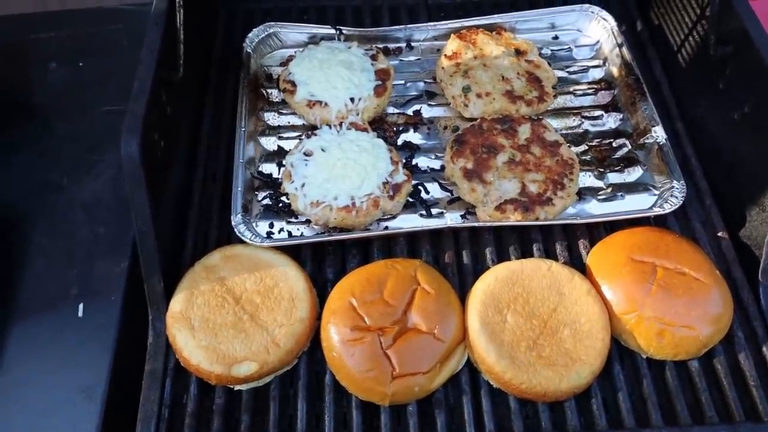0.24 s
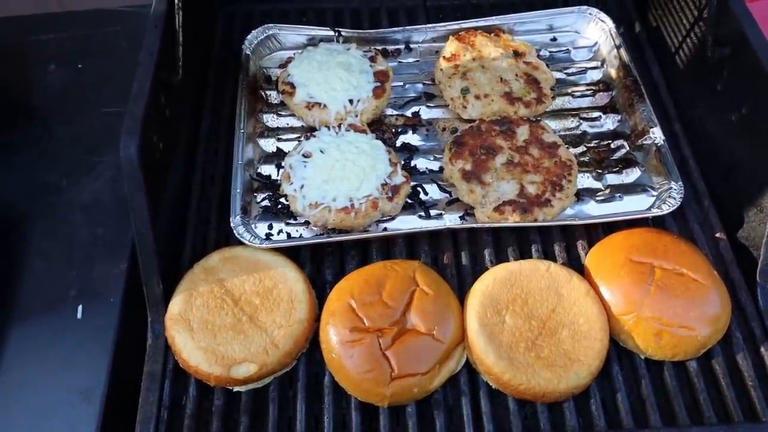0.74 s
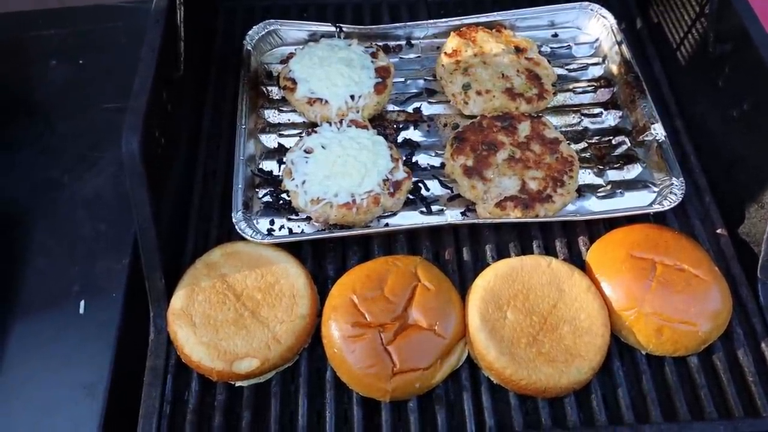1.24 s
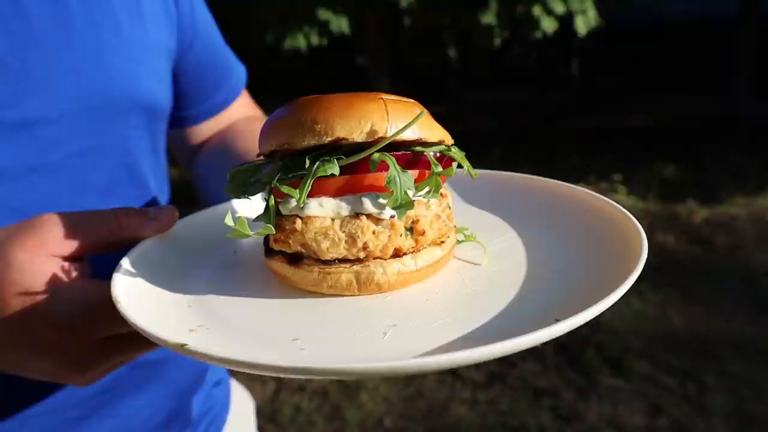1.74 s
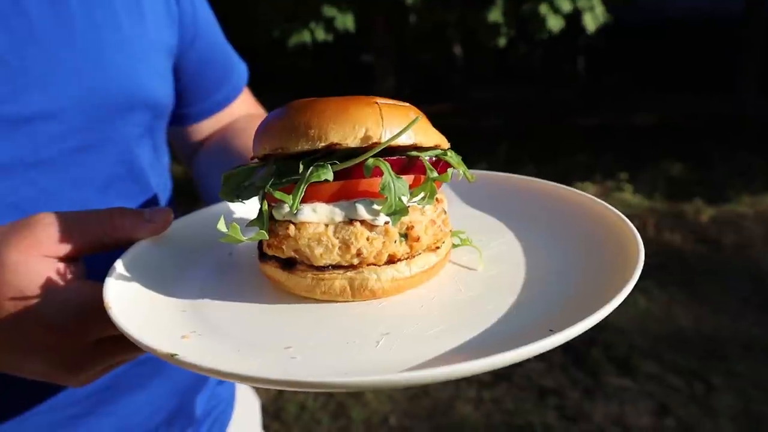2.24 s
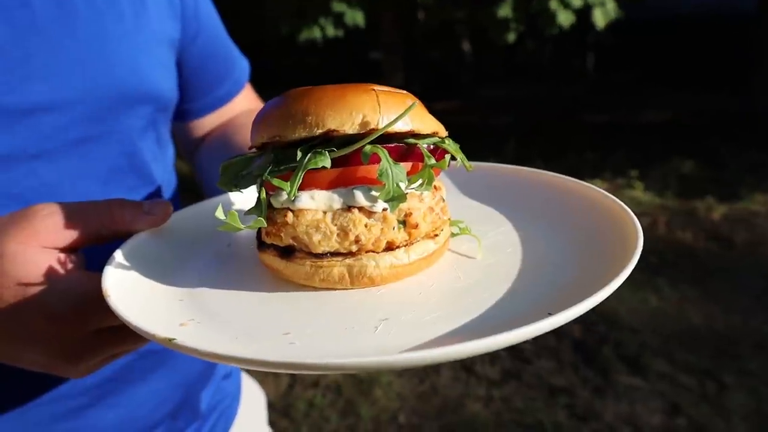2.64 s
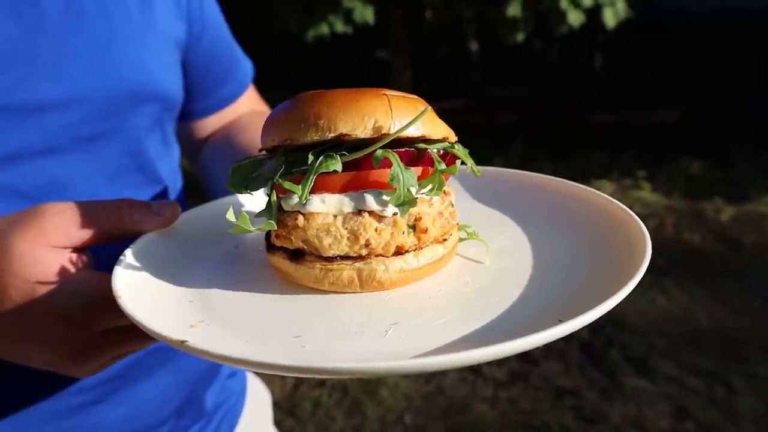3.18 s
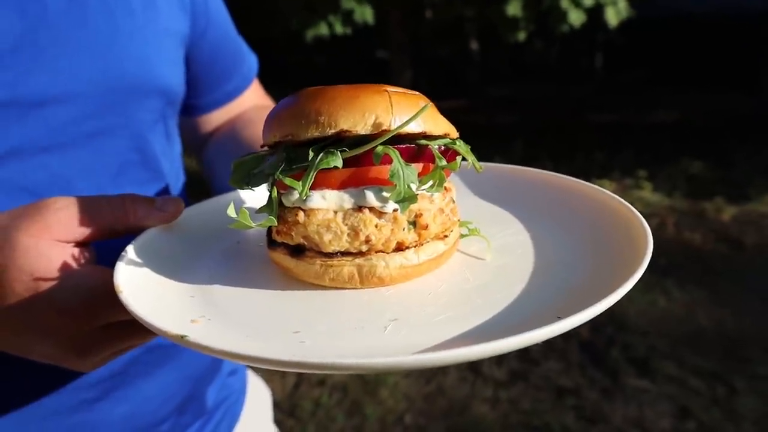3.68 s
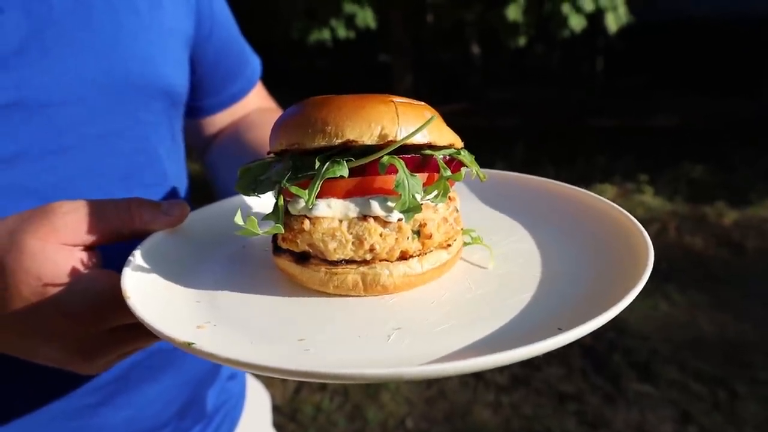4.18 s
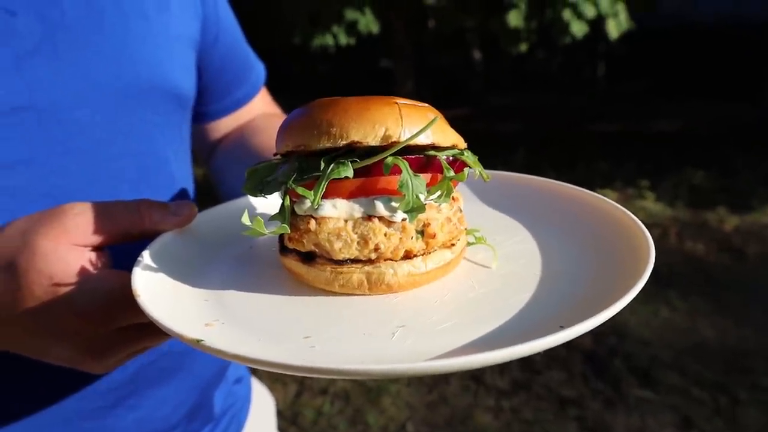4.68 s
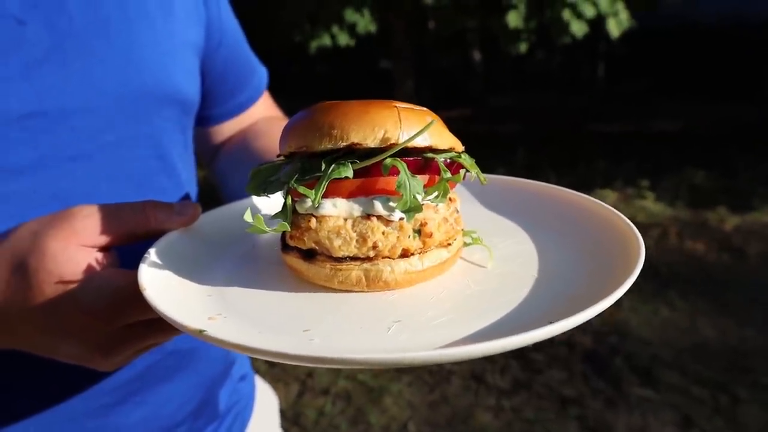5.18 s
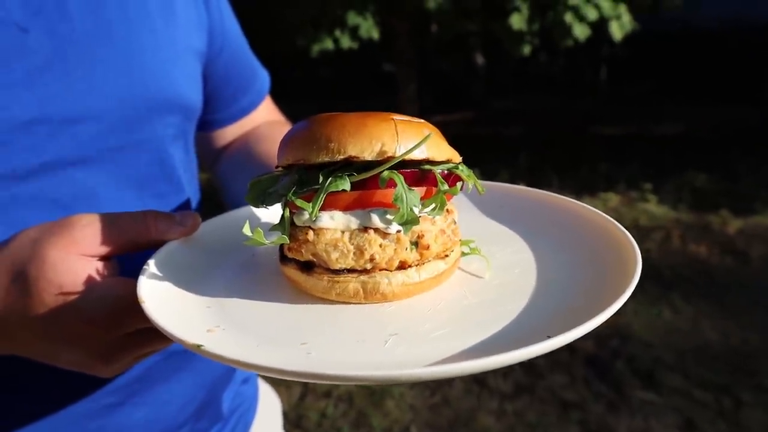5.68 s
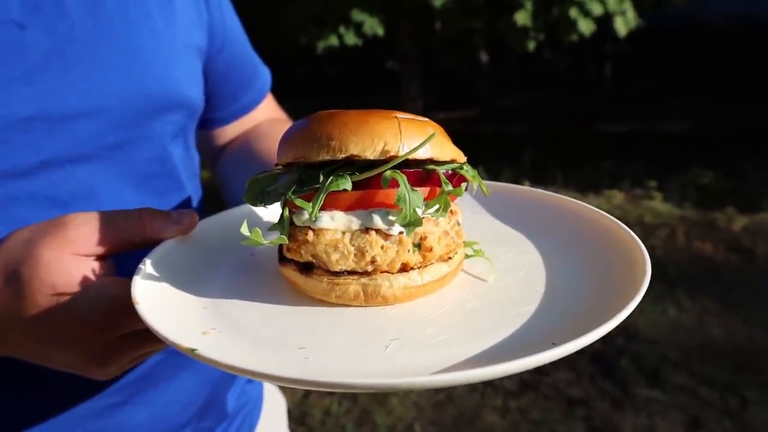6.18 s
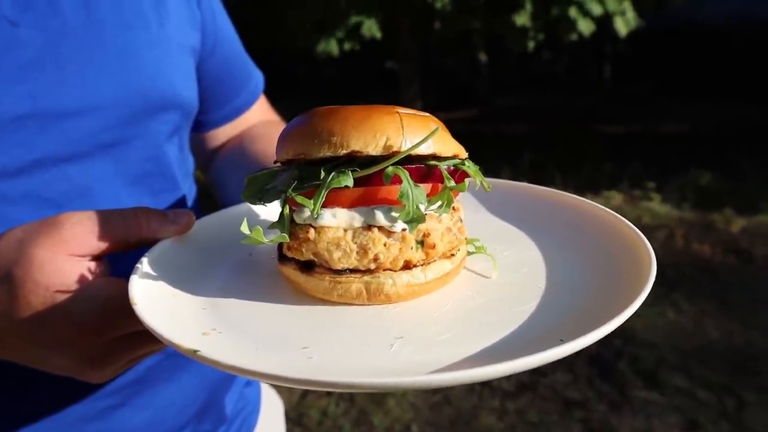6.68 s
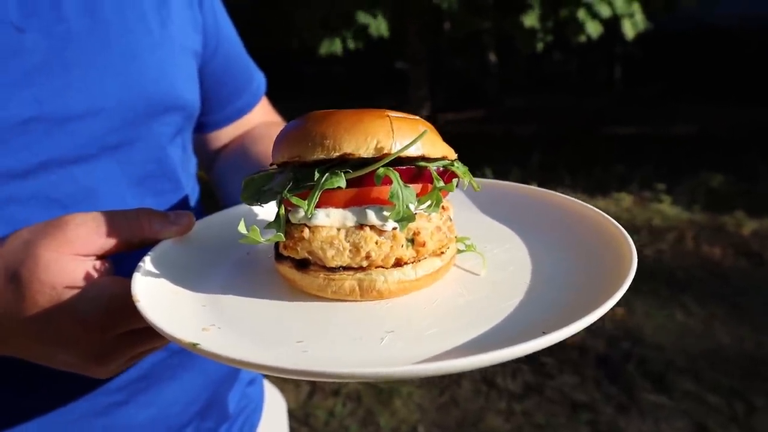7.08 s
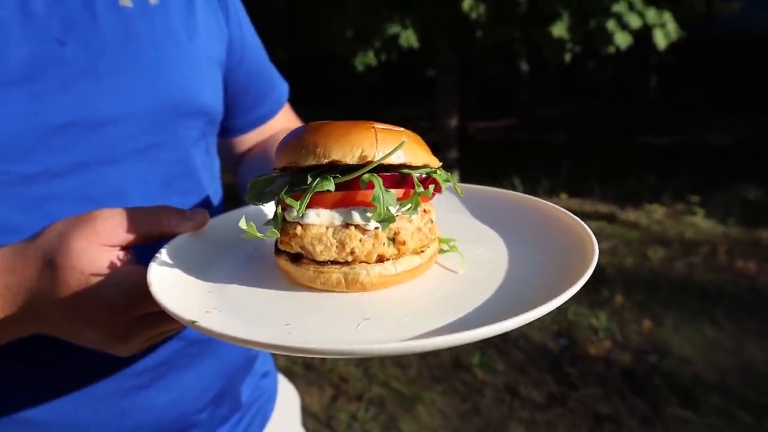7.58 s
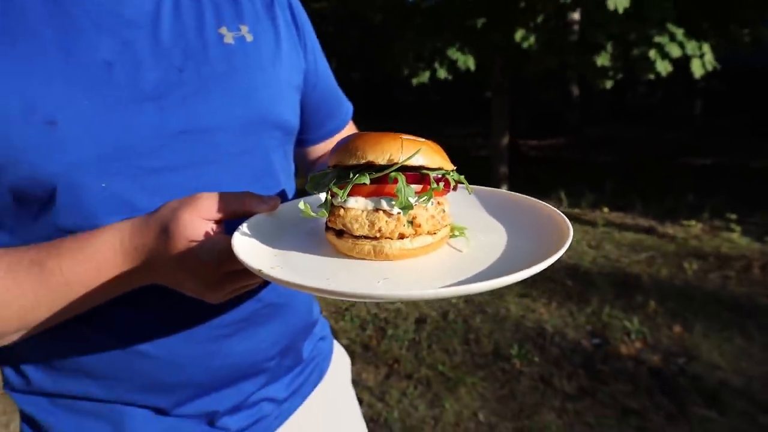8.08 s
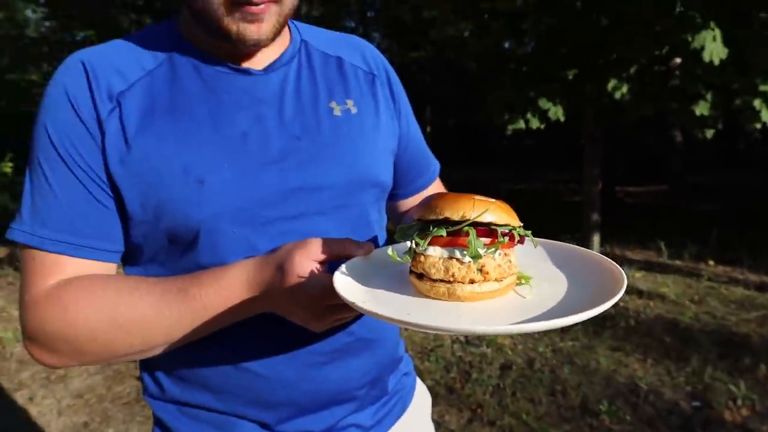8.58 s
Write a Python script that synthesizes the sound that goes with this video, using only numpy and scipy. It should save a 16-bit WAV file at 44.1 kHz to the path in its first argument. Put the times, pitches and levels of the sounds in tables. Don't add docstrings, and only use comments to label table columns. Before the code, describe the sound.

Fat sizzles and spits loudly over a roaring gas grill with crickets chirping, then a sudden cut to a quieter yard with a vehicle droning away.

```python
import sys
import numpy as np
from scipy import signal
from scipy.io import wavfile
from scipy.ndimage import uniform_filter1d

SR = 44100
rng = np.random.default_rng(int(sys.argv[2]) if len(sys.argv) > 2 else 0)


def waveform_to_disk(signal):
    frames = np.transpose(np.atleast_2d(signal))
    scaled = np.clip(frames, -1, 1) * 32767
    samples = np.round(scaled).astype(np.int16)
    wavfile.write(sys.argv[1], SR, samples)


def volts_from_decibels(level):
    exponent = np.asarray(level, float) / 20
    return 10 ** exponent


N = 389395

GRILL_END_S, YARD_START_S = 1.8008, 1.8118
# f/Hz, density/dB
AIR_COLOR = [(120, -34), (200, -1), (456, -5.5), (763, -3), (1320, -7.5), (3130, -22), (3760, -21.5),
             (4600, -17), (5630, -25.5), (14600, -35.5), (16000, -35.5)]
# f/Hz, density/dB
ROAD_COLOR = [(59, -39), (100, -8.5), (124, -6), (147, -30.5), (207, -26), (249, -29), (498, -23.5),
              (1280, -20), (1660, -23.5), (2680, -37), (4000, -43), (5200, -81.5), (8800, -120)]
# t/s, level/dB
ROAD_LEVEL = [
    (1.82, -42),
    (2.89, -42.5),
    (6.12, -52),
    (6.25, -55),
    (7.54, -51.5),
    (8.79, -63),
    (8.83, -56),
]
# f/Hz, density/dB
WIND_COLOR = [(15, -3.5), (30, 2.5), (50, 2), (100, -6), (160, -20), (300, -30.5), (600, -55)]
# peak t/s, peak level/dB, time to fall by PUFF_FALL_DB/s
GUSTS = [(1.82, -51, .2), (3.5, -50.5, 0.04), (3.82, -38.5, 0.1546), (3.98, -36.5, 0.15),
         (4.12, -42.5, 0.15), (4.36, -45.5, 0.12), (4.62, -33.5, 0.1554), (4.775, -31.5, 0.06),
         (5.03, -39, 0.1332), (5.13, -43.5, .2), (5.3, -42.5, 0.17), (5.51, -46.5, 0.25),
         (5.64, -48.5, 0.3), (6.45, -51, 0.7), (7.21, -45, .2), (7.38, -48.5, 0.63), (7.62, -49, 0.5),
         (7.83, -43.5, 0.1), (7.96, -42.5, 0.14), (8.14, -36, .25), (8.32, -38.5, 0.22),
         (8.57, -40.5, 0.21), (8.71, -40, 0.22)]
PUFF_FALL_DB, CALM_DB = 19.5, -59
# middle t/s, length/s, low singers' drop/dB, middle singers' drop/dB
LULLS = [(2.27, .3, 5, 18), (2.72, 0.19, 11.5, 14.5), (2.97, .22, 10.5, 16.5), (3.38, 0.35, 0, 16),
         (4.9, 0.4995, 26, 11.5), (5.4, 0.3584, 22, 22), (5.7, 0.293, 14, 1), (6.15, 0.415, 23, 5),
         (6.58, .3, 20.5, 25), (6.93, .18, 20, 14.5), (7.25, .2, 5, 14), (8.15, 0.2016, 12.5, 20),
         (8.39, .16, 20.5, 5.5), (8.799, 0.295, 10, 2.5)]
# t/s, peak level/dB, f/Hz of the loud first half
YARD_STROKES = [(1.935, -52, 4620), (1.998, -52, 4590), (2.105, -54, 4680), (2.349, -48, 4590),
                (2.397, -48, 4610), (2.484, -45, 4680), (2.527, -46, 4690), (2.576, -45, 4650),
                (2.602, -49, 4740), (2.644, -55, 4730), (2.770, -49, 4600), (2.814, -49, 4620),
                (3.072, -45, 4690), (3.108, -45, 4680), (3.148, -46, 4660), (3.189, -48, 4680),
                (3.552, -52, 4610), (3.675, -46, 4670), (3.719, -45, 4680), (3.769, -46, 4670),
                (4.347, -51, 4560), (4.372, -46, 4670), (4.416, -46, 4670), (4.466, -44, 4690),
                (4.525, -53, 4730), (5.013, -45, 4680), (5.049, -50, 4630), (5.061, -46, 4690),
                (5.082, -50, 4700), (5.107, -47, 4700), (5.129, -48, 4740), (5.581, -54, 4550),
                (5.626, -54, 4620), (5.699, -54, 4570), (5.744, -46, 4670), (5.792, -46, 4690),
                (5.842, -46, 4680), (5.960, -53, 4560), (6.173, -54, 4690), (6.222, -54, 4650),
                (6.318, -45, 4670), (6.363, -45, 4700), (6.412, -45, 4700), (6.735, -54, 4590),
                (6.785, -51, 4560), (7.027, -45, 4680), (7.073, -47, 4680), (7.121, -45, 4680),
                (7.149, -52, 4750), (7.429, -53, 4530), (7.722, -52, 4580), (7.776, -50, 4600),
                (7.809, -52, 4580), (7.929, -51, 4620), (7.986, -50, 4480), (8.208, -48, 4640),
                (8.249, -48, 4630), (8.287, -48, 4610)]
# t/s, thud level/dB, crack level/dB, spray level/dB, thud f/Hz
TICKS = [
    (1.917, -81, -70, -55, 900),
    (3.059, -80, -60, -50, 901),
    (3.097, -80, -71, -55, 901),
    (3.16, -73, -70, -56, 900),
    (3.709, -31.5, -60, -60, 306),
    (3.7205, -29, -37, -41.5, 798),
    (3.896, -80, -60, -54, 900),
    (7.9703, -60, -55, -40, 3740),
]
# f/Hz, level/dB, t60/s
CLINK_MODES = [(3517, -10, 0.0454), (5210, -1, 0.027), (5080, -8, .015), (5420, -16, .04),
               (6400, -16.5, 0.0275)]
# f/Hz, level/dB, t60/s
SNAP_MODES = [(3800, 0, .009), (4600, -3, .007), (5400, -2, .007), (2900, -6, .006), (6400, -3, .005),
              (10300, -7, .003)]
# t/s, firing rate f/Hz, first order level/dB, second order level/dB
ENGINE = [(1.82, 95.3, -35, -48), (1.92, 95.98, -32, -54), (2.15, 97.17, -32.5, -43),
          (2.56, 100.3, -28.5, -56), (2.76, 101.1, -30, -49.5), (3.21, 101.9, -28.5, -54.5),
          (3.4, 90.63, -37.5, -43.5), (3.52, 84, -34.5, -53), (3.65, 76.42, -39, -44),
          (3.93, 75.7, -43, -42), (4.32, 76.7, -44.5, -51), (4.75, 77.4, -39, -46),
          (5.55, 79.12, -43.5, -45.5), (5.74, 78.9, -40, -56), (6.12, 80.19, -42, -64.5),
          (6.47, 80.48, -41, -52.5), (8.63, 84.14, -46, -45.5), (8.83, 83.95, -39, -44)]
# t/s, level/dB
WHINE_LEVEL = [
    (3.9, -80.5),
    (4.15, -57),
    (4.4, -52.5),
    (5.0, -53.5),
    (5.4, -79.5),
]
# middle stroke t/s, peak level/dB, f/Hz, wait for the last stroke/s
NEAR_CHIRPS = [
    (-.022, -28, 4983, 0.0371),
    (.3315, -27.5, 4970, 0.035),
    (.682, -27.5, 4978, .041),
    (.746, -28.5, 4748, 0.0365),
    (1.019, -29, 4993, .041),
    (1.399, -29, 4738, 0.0327),
    (1.418, -30, 4980, .039),
    (1.692, -31.5, 4754, .039),
    (1.774, -29.5, 4937, .037),
]
# level below peak/dB, pitch shift/Hz, pitch fall/Hz, length/s
CHIRP_SHAPE = [
    (-11, -80.5, 280, 0.0198),
    (-2, -1.5, 647, 0.02625),
    (0, 58.5, 576, 0.0301),
]
# f/Hz, density/dB
BURNER_COLOR = [(15, -44), (25, -11), (59, -11), (123, -1.5), (155, -0.5), (325, -6.5), (406, -27),
                (474, -18.5), (600, -26.5), (700, -23.5), (910, -32.5), (1540, -120)]
# t/s, level/dB
FLAME_LEVEL = [
    (0.0, -37),
    (0.19, -38),
    (0.42, -34),
    (0.546, -42.5),
    (0.586, -36),
    (1.724, -38.5),
    (1.774, -31.5),
    (1.8, -42.5),
]
# f/Hz, density/dB
SIZZLE_COLOR = [(240, -29), (400, 5), (579, -4.5), (753, 1), (826, -1), (1420, -2.5), (1760, 1),
                (2020, -3.5), (3870, -0.5), (5350, -5), (9610, -8), (13500, -6), (16000, -7)]
# t/s, thud level/dB, crack
# level/dB, spray level/dB, thud f/Hz
POPS = [(.0571, -19.5, -24, -42, 2030), (.0606, -25, -32.5, -20, 1640), (.2059, -57, -29, -13.5, 1670),
        (.4098, -35.5, -18.5, -60, 1150), (.4122, -21, -33, -59, 1210), (.4171, -36.5, -17, -43, 1210),
        (.419, -25, -20.5, -60, 1240), (.4968, -42.5, -29.5, -13.5, 935), (.9467, -38, -14.5, -10.5, 2070),
        (1.0358, -27, -22, -39.5, 1210), (1.0386, -14.5, -36, -48, 1144), (1.0414, -19, -24, -22, 1100),
        (1.0435, -25.5, -30, -27.5, 489), (1.0573, -23, -35.5, -43, 1140),
        (1.0654, -30.5, -34.5, -19.5, 472), (1.0779, -33, -40, -24.5, 476),
        (1.0814, -32, -46, -14.5, 1120), (1.0856, -33, -34.5, -26, 1230),
        (1.1389, -23.5, -37, -14.5, 1970), (1.1724, -27.5, -29.5, -34.5, 1940),
        (1.3023, -35, -36.5, -18, 446), (1.5005, -35, -16, -11, 689.5), (1.5532, -43, -30, -13, 1840),
        (0.422, -30.5, -28, -60, 480),
    (.537, -30.5, -60, -60, 700),
    (.678, -26.5, -60, -60, 529),
    (.999, -30, -33.5, -40, 1200),
    (1.0945, -29, -25, -24, 1500),
    (1.122, -30, -60, -60, 1120),
    (1.275, -32, -59, -60, 963),
]
# t/s, crack level/dB, spray level/dB
DROPLETS = [(.036, -30.5, -11), (.0788, -43, -16.5), (.093, -30.5, -27.5), (.1424, -28, -37),
            (.3927, -36, -30), (.459, -29.5, -27), (0.4753, -22, -25.5), (0.5125, -44.5, -19),
            (.5736, -36, -14), (.6175, -37.5, -21), (0.6477, -47, -14.5), (.6749, -44, -17),
            (.74, -47, -17), (.7837, -30, -17.5), (.7879, -33, -15.5), (.8491, -52, -16.5),
            (0.8563, -34, -19), (.8776, -43.5, -16.5), (1.1587, -31.5, -26), (1.183, -36, -20),
            (1.1894, -51, -21), (1.2246, -60, -17), (1.3198, -43.5, -18.5), (1.3777, -38.5, -12.5),
            (1.3893, -30, -16), (1.4224, -54, -14.5), (1.671, -53, -18.5), (1.72, -32.5, -16.5),
            (1.7954, -39, -14.5)]
# t/s, thud level/dB, crack level/dB, spray level/dB, thud f/Hz
FAINT_SPITS = [
    (.4435, -60, -30, -22, 1000),
    (.584, -60, -29, -24, 1000),
    (1.0885, -28, -40, -40, 2300),
    (1.4905, -28, -36, -30, 900),
    (1.5735, -36, -27, -21, 1900),
    (1.761, -60, -32, -21, 1000),
    (1.7915, -60, -34, -20, 1000),
]


def evened(x):
    return x / np.sqrt(np.mean(x ** 2) + 1e-20)


def wander(samples):
    drift = uniform_filter1d(rng.standard_normal(N), size=samples)
    return evened(uniform_filter1d(drift, size=samples))


def columns(rows):
    s, *values = np.transpose(rows)
    return [np.interp(np.arange(N) / SR, s, v) for v in values]


def add(mix, s, sound):
    part = mix[max(round(s * SR), 0):][:len(sound)]
    part += sound[:len(part)]


def noise(color, patchy_db, flicker_db, size=1024):
    hz = np.fft.rfftfreq(size, 1 / SR)
    real, imag, patches = rng.standard_normal((N * 4 // size + 6, len(hz), 3)).T
    flicker = evened(uniform_filter1d(patches[0], size=3))
    patches = uniform_filter1d(patches, size=9, axis=0)
    patches = evened(uniform_filter1d(patches, size=9, axis=1))
    f, db = np.transpose(color)
    color_db = np.interp(np.log(hz + 1), np.log(f + 1), db, left=-90, right=-90)
    gain = volts_from_decibels(color_db[:, None] + patchy_db * patches + flicker_db * flicker)
    spectra = (real + 1j * imag) * gain
    return evened(signal.istft(spectra, nperseg=size, noverlap=size * 3 // 4)[1][:N])


def steadied(x, share, size):
    power = uniform_filter1d(x ** 2, size)
    return evened(x / (power + .03) ** (share / 2))


def echoes(x, t60):
    at = np.arange(60, SR // 4, 20)
    taps = np.zeros(SR // 4 + 20)
    places = at + rng.integers(0, 20, len(at))
    taps[places] = rng.choice([-1., 1.], len(at)) * volts_from_decibels(-60 * at / SR / t60)
    return signal.oaconvolve(x, taps / np.linalg.norm(taps))[:N]


def ring(hz, cycles, size=300):
    turns = np.arange(size) * hz / SR
    envelope = np.minimum(turns / 0.533, 1) * np.exp(-turns / cycles)
    wave = envelope * np.sin(2 * np.pi * turns)
    return wave / abs(wave).max()


def bursts(rows):
    out = np.zeros(N)
    for (s, thud_db, crack_db, spray_db, hz), (a, b, c) in zip(rows, rng.random((len(rows), 3))):
        thud = volts_from_decibels(thud_db) * (ring(hz, 1.3) + .5 * ring(2.1 * hz, 1.3))
        crack = volts_from_decibels(crack_db) * ring(3000 + 700 * a, 1.)
        edge = volts_from_decibels((crack_db + spray_db) / 2) * ring(5000 + 800 * b, 1.)
        spray = volts_from_decibels(spray_db - 3) * (ring(7500 + 1500 * b, .9) + .9 * ring(12000 + 2500 * c, 1.1))
        add(out, s - .0003, thud + crack + edge + spray)
    return out


def wing_stroke(hz, fall_hz, length):
    u = np.arange(round(length * SR)) / (length * SR)
    slope = np.clip(np.minimum(u / .22, (1 - u) / .5), 0, 1)
    pitch = hz - fall_hz * (u ** 1.8 - .3)
    return np.sin(np.pi / 2 * slope) ** 2 * np.sin(2 * np.pi * np.cumsum(pitch) / SR)


def crickets(strokes, t60, wet_db, flutter_db):
    out = np.zeros(N)
    for s, db, *shape in strokes:
        add(out, s, volts_from_decibels(db) * wing_stroke(*shape))
    flutter = volts_from_decibels(flutter_db * wander(60))
    scatter = echoes(out * flutter[::-1], t60)
    return flutter * (out + volts_from_decibels(wet_db) * scatter)


def air():
    return volts_from_decibels(-48.5) * noise(AIR_COLOR, 0.72, 0.59)


def road_wash():
    return volts_from_decibels(columns(ROAD_LEVEL)[0] + 2.0) * noise(ROAD_COLOR, 0.63, 0.2)


def gusts():
    t = np.arange(N) / SR
    puffs_db = [db - PUFF_FALL_DB * abs(t - s) / fall for s, db, fall in GUSTS]
    level_db = np.maximum(np.max(puffs_db, axis=0), CALM_DB)
    return volts_from_decibels(level_db + 4) * steadied(noise(WIND_COLOR, 1.43, 1.02, size=2048), 0.98, size=2500)


def lull_db(column):
    t = np.arange(N) / SR
    return sum(row[column] * np.clip(1 - 2 * abs(t - row[0]) / row[1], 0, 1) for row in LULLS)


def far_chorus():
    out = np.zeros(N)
    groups = [(-63.5 - lull_db(column=2), 4330, 200), (-61 - lull_db(column=3), 4640, 190),
              (-70, 5020, 150), (-77, 7250, 300)]
    every_s = .012
    for level_db, hz, spread_hz in groups:
        strokes = np.zeros(N)
        starts = np.arange(YARD_START_S, N / SR, every_s)
        for s, (late, pitch, size) in zip(starts, rng.random((N // 100, 3))):
            sound = wing_stroke(hz + spread_hz * (2 * pitch - 1), 382, 0.02202)
            add(strokes, s + every_s * late, volts_from_decibels(5 * size) * sound)
        out += volts_from_decibels(level_db - 1.5) * evened(1.06 * strokes + echoes(strokes, 0.15))
    return out


def yard_crickets():
    rise_s, direct_db, shift_hz, fall_hz, length_s = .007, -5, -40, 330, .032
    strokes = [(s - rise_s, db + direct_db, hz + shift_hz, fall_hz, length_s) for s, db, hz in YARD_STROKES]
    return crickets(strokes, t60=.2, wet_db=-1.5, flutter_db=2.5)


def clink(start, level_db, modes, rise):
    t, out = np.arange(3000) / SR, np.zeros(N)
    rings = sum(volts_from_decibels(level_db + db - 60 * t / t60) * np.sin(2 * np.pi * hz * t) for hz, db, t60 in modes)
    add(out, start, rings * (1 - np.exp(-(t / rise) ** 2)))
    return out


def small_objects():
    rings = clink(3.0588, -26, CLINK_MODES, .00067) + clink(7.97, -35, SNAP_MODES, .0003)
    return bursts(TICKS) + rings


def engine():
    hz, *orders_db = columns(ENGINE)
    turns = np.cumsum(hz) / SR
    third_db = -61 - 0.4 * (hz - 80)
    out = np.zeros(N)
    for order, db in enumerate([*orders_db, third_db], start=1):
        waver = wander(3000)
        tone = np.sin(2 * np.pi * (order * turns + 0.026 * waver))
        out += np.sqrt(2) * volts_from_decibels(db + 1.12 * waver) * tone
    whine = volts_from_decibels(columns(WHINE_LEVEL)[0]) * np.sin(2 * np.pi * 9 * turns)
    return out + whine


def yard():
    ambience = air() + road_wash() + gusts()
    singers = far_chorus() + yard_crickets()
    return ambience + singers + small_objects() + engine()


def near_crickets():
    lead_s = .033
    strokes = []
    for s, db, hz, wait in NEAR_CHIRPS:
        for late, (below_db, shift_hz, fall_hz, length) in zip((-lead_s, 0, wait), CHIRP_SHAPE):
            if s + late > 0:
                strokes.append((s + late, db + below_db, hz + shift_hz, fall_hz, length))
    return crickets(strokes, t60=.07, wet_db=-12, flutter_db=1.2)


def flame_roar():
    roar = steadied(noise(BURNER_COLOR, 1.48, 0.92, size=2048), 0.24, size=3000)
    return volts_from_decibels(columns(FLAME_LEVEL)[0] + 1.5) * roar


def crackle(per_s=900, spread_db=5.2):
    out, span = np.zeros(N), 2 * SR
    for hz in np.linspace(2500, 15000, num=12):
        size = volts_from_decibels(spread_db * np.minimum(rng.exponential(1, span), 3))
        hits = size * (rng.random(span) < per_s / 12 / SR)
        add(out, 0, signal.oaconvolve(hits, ring(hz, 1.1)))
    return out / np.std(out[:span])


def sizzle():
    hiss = noise(SIZZLE_COLOR, 1.1, 1.1, size=512)
    return volts_from_decibels(-40.5 + 3.2) * (hiss + volts_from_decibels(-6.5) * crackle())


def spitting_fat():
    droplets = [(s, -np.inf, crack_db, spray_db, 1000) for s, crack_db, spray_db in DROPLETS]
    spits = bursts(POPS + droplets)
    return spits + volts_from_decibels(-8) * echoes(spits, .025) + bursts(FAINT_SPITS)


def grill():
    return near_crickets() + flame_roar() + sizzle() + spitting_fat()


def scene():
    t = np.arange(N) / SR
    grill_gate = np.clip((GRILL_END_S - t) / 0.00076, 0, 1)
    yard_gate = np.clip((t - YARD_START_S) / 0.0034, 0, 1)
    return (grill_gate * grill() + yard_gate * yard())[None]


def roll_off(x):
    return signal.sosfilt(signal.butter(12, 16830, fs=SR, output="sos"), x)


def record(dry):
    dithered = dry + volts_from_decibels(-117) * rng.standard_normal(dry.shape)
    lowpass = signal.firwin(511, 15900, window=("kaiser", 9), fs=SR)
    limited = signal.oaconvolve(dithered, lowpass[None], "same")
    return roll_off(limited)


dry = scene()
out = record(dry)
waveform_to_disk(out)
```